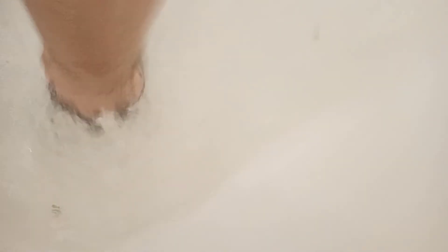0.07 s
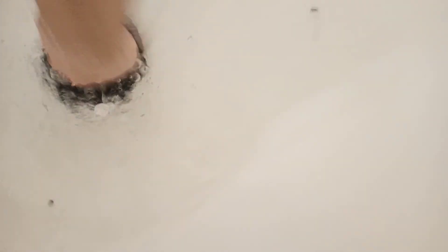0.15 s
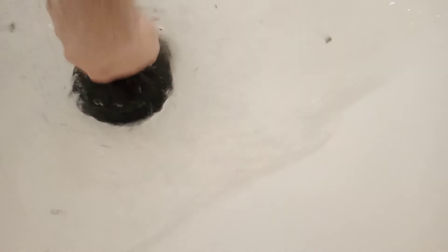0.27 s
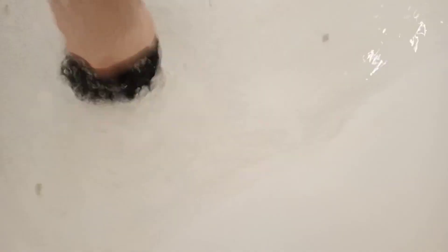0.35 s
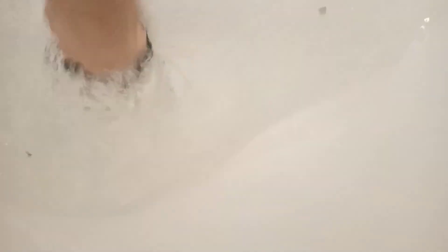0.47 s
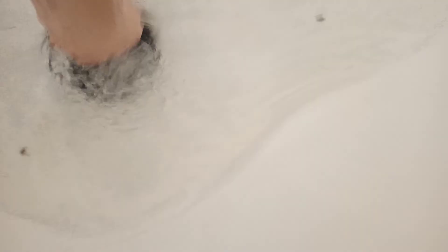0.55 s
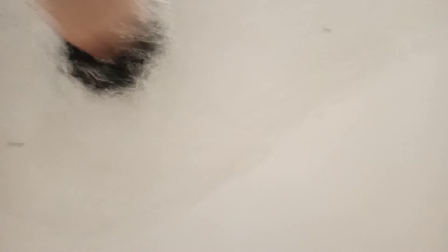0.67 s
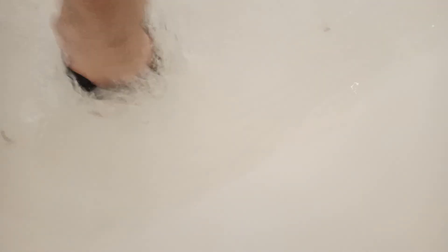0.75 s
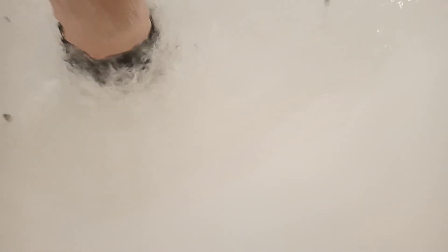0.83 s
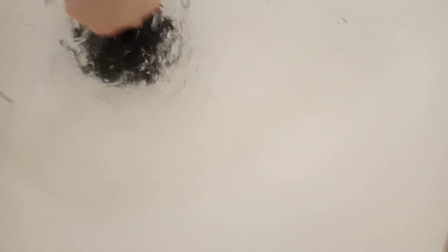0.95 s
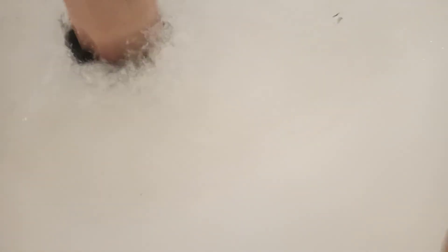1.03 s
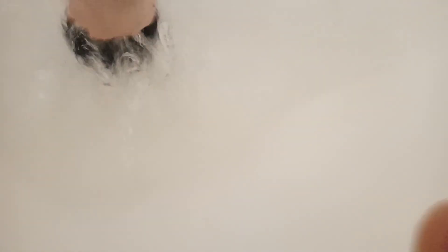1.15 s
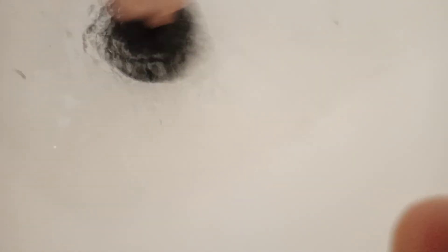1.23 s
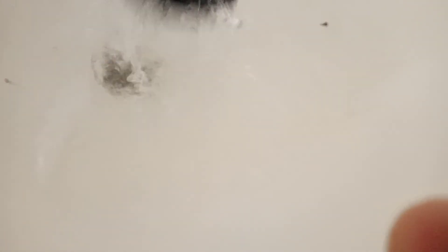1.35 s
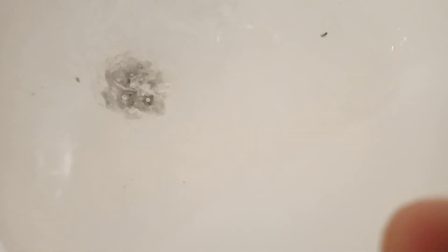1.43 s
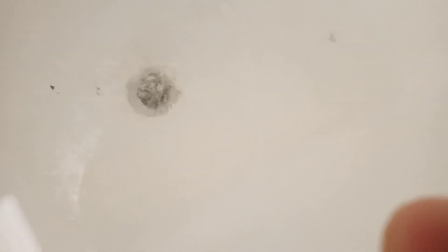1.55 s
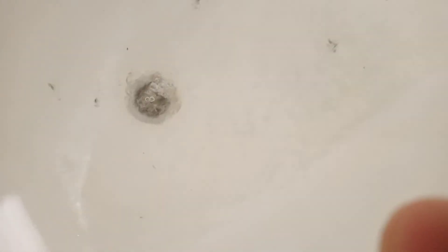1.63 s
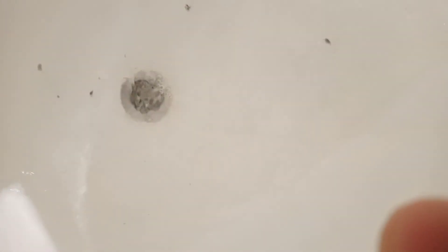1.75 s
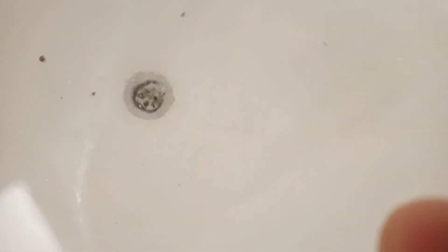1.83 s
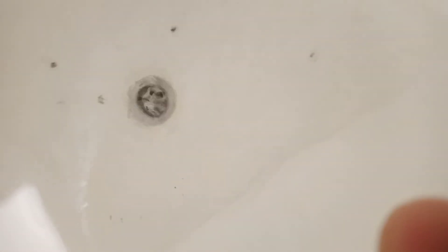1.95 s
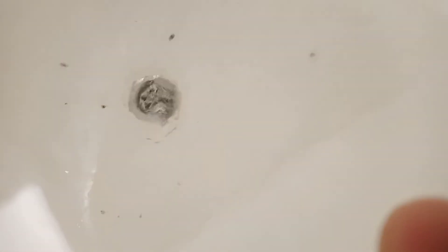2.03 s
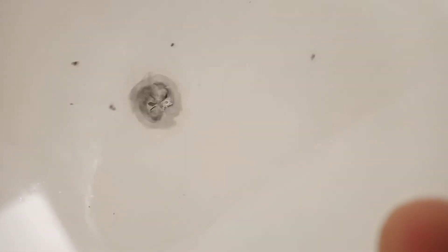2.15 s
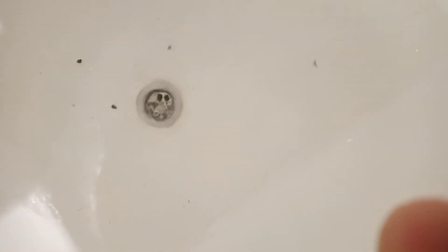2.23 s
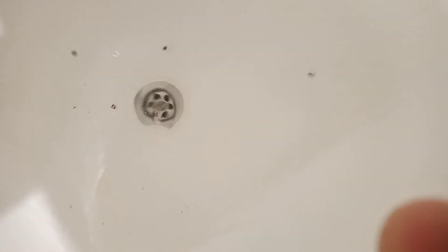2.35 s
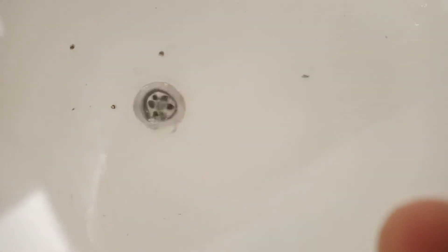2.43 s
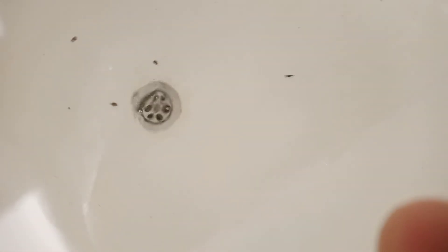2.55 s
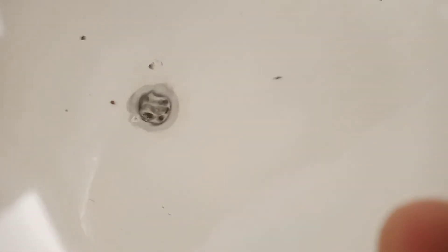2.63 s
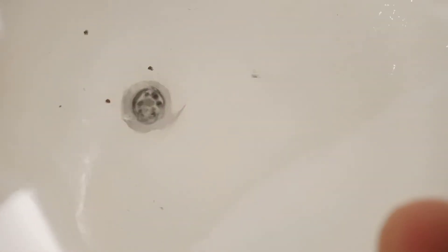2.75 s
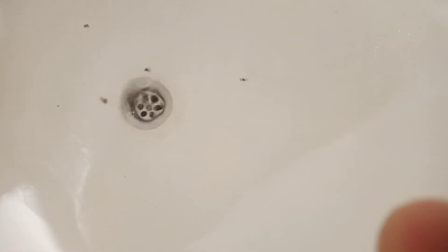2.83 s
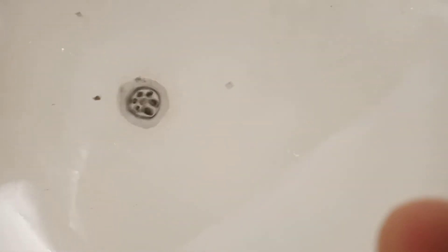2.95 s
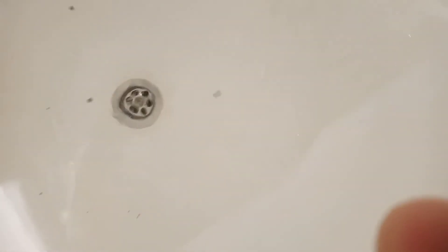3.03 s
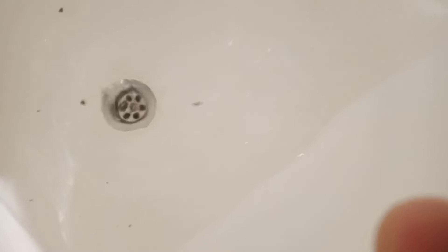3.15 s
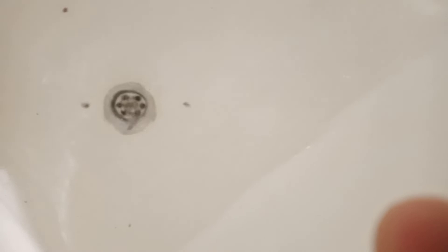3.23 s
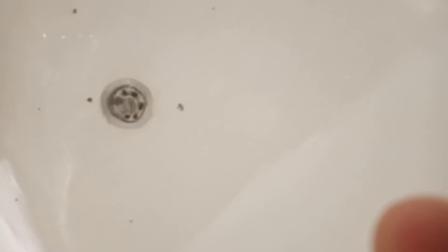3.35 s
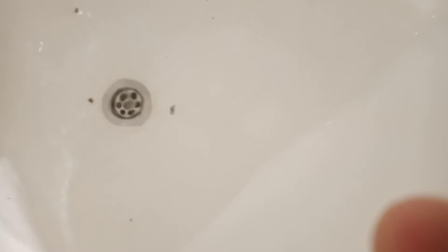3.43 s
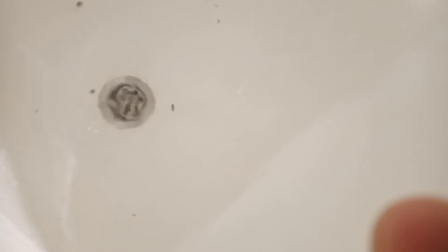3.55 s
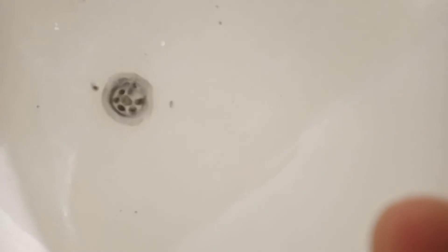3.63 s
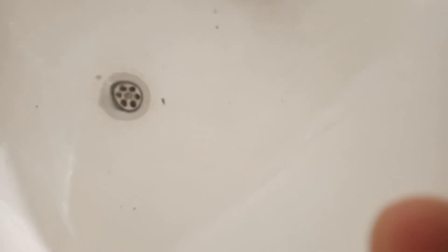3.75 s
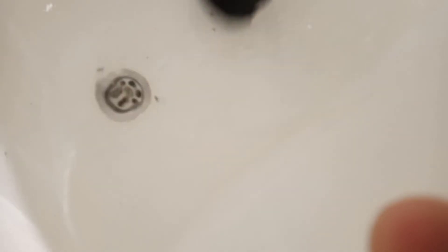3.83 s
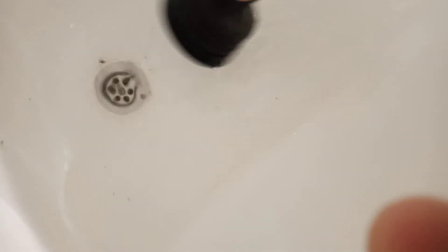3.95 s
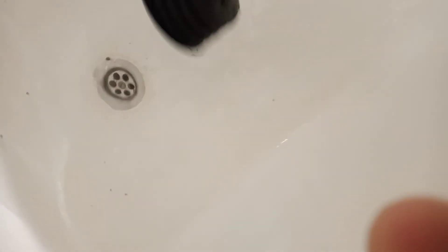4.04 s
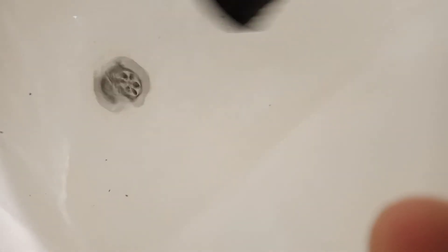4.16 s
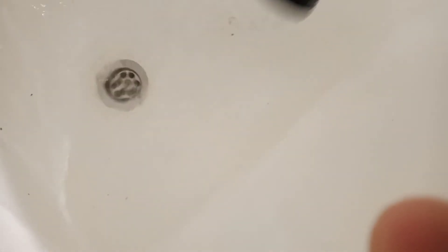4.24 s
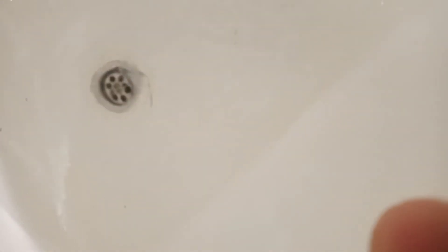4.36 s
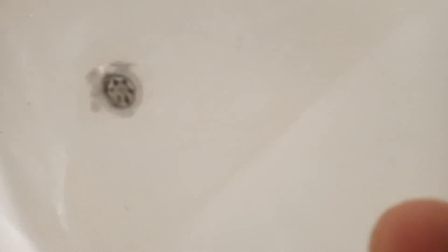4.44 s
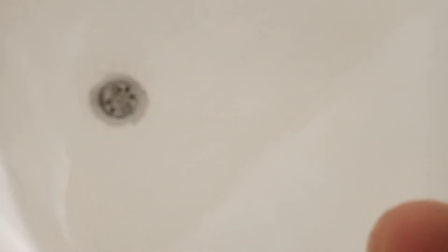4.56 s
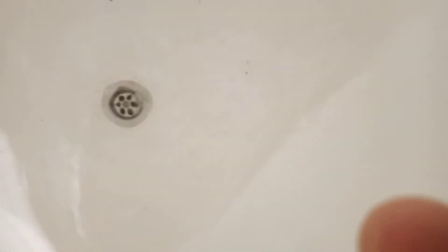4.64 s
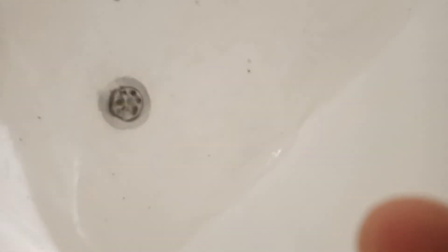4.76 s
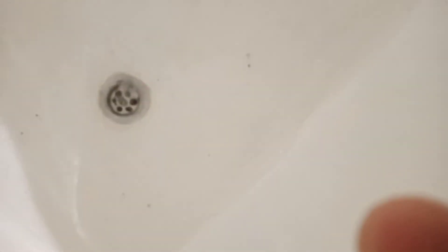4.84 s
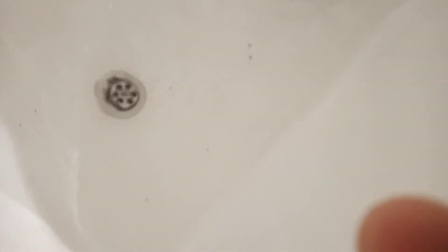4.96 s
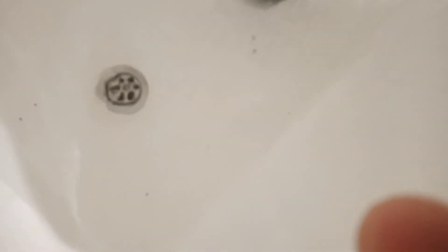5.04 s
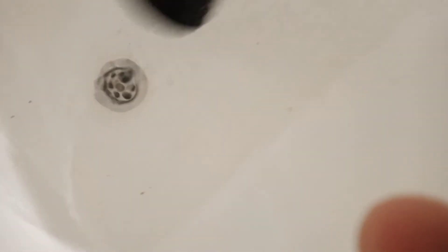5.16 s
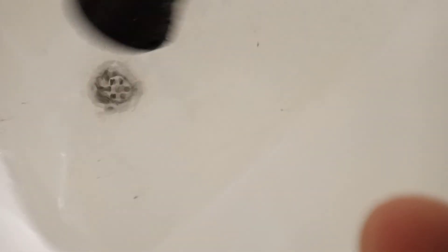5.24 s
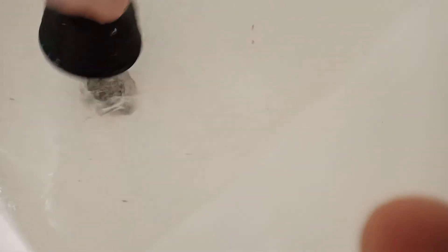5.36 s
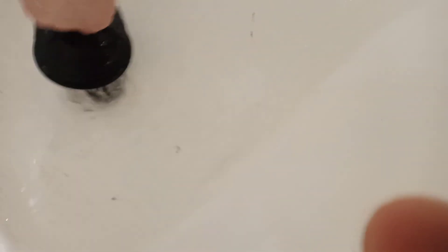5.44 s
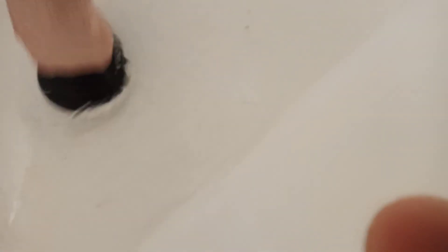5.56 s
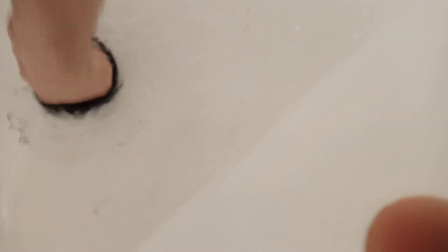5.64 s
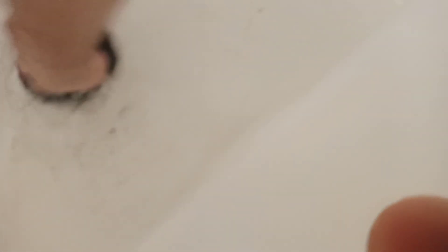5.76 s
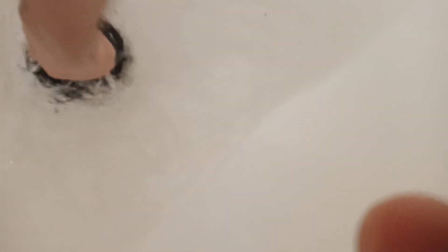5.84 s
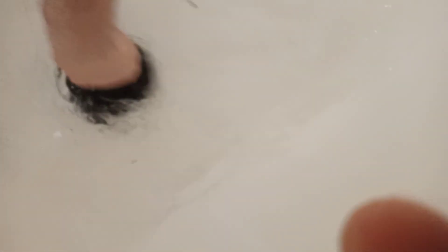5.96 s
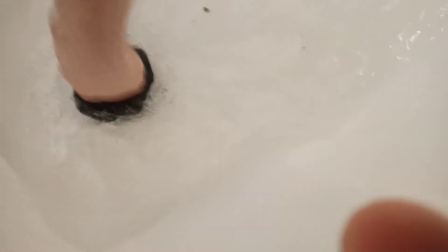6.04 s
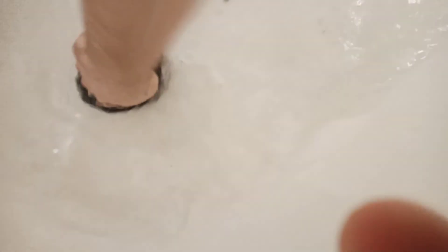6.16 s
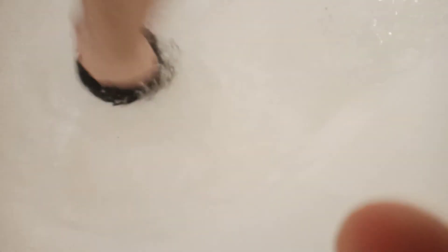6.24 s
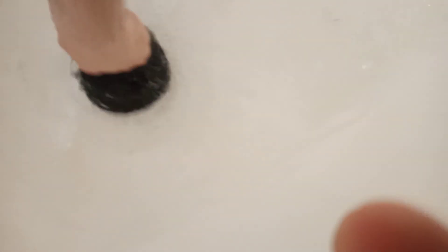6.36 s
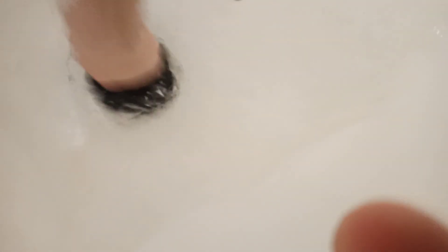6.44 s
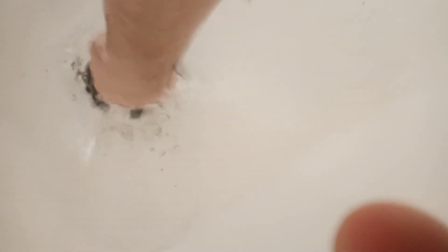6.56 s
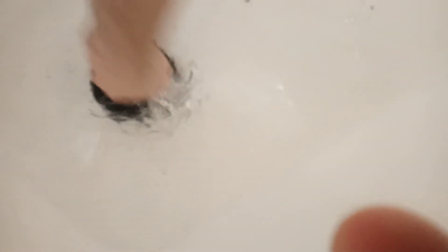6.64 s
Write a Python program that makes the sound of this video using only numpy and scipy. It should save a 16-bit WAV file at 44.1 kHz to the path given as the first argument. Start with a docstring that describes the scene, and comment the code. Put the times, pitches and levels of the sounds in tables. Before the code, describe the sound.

A rubber plunger pumps fast in shallow bathtub water, squelching and slapping, then droplets tick in quiet before wet, gulping strokes resume.

```python
"""Plunger in a bathtub

A rubber plunger is pumped over the drain of a tub with shallow water, lifted, left to drip, and pumped again.
Strokes heave the water (low tub modes struck at random), tear bubbles loose (sines rising as they die) and
throw spray (small bubbles); slaps are noise bursts, trapped air escapes in gulps (gliding sines), droplets tick.
Water and air ring in the hard tub and small bathroom, over handling bumps, a weak rumble and room hush."""
import sys
import numpy as np
from scipy import signal
from scipy.fft import rfft, irfft
from scipy.io import wavfile

SR = 44100
rng = np.random.default_rng(int(sys.argv[2]) if len(sys.argv) > 2 else 0)


def digitize_waveform(pressure):
    """Quantize a signal to 16-bit integers and store it at the path in sys.argv[1].

    Rows of a 2-D input are taken as channels; values are limited to [-1, 1].
    """
    field = np.atleast_2d(pressure).T
    bounded = np.clip(field, -1, 1)
    quanta = np.round(bounded * 32767).astype(np.int16)
    wavfile.write(sys.argv[1], SR, quanta)


N = 295029

# modes of the tub: pitch_hz, relative_level_db, t60_s
TUB_MODES = [(96.5, -4, 0.8), (99.8, -5.5, 0.26), (149.2, 5.5, 0.63), (179.8, 5, 0.22), (228.4, 0.5, 0.34),
             (272.9, -0.5, 0.27), (346.5, 1.5, 0.57), (425, 3.5, 0.61), (504, 3.5, 0.37), (667, -17, 0.27),
             (741, -5.5, .4), (910, -25, 0.14), (1065, -0.5, 0.3), (1080, 5, 0.23), (1290, -19, 0.65),
             (1293, -18.5, 0.99), (1342, 10, 0.074)]


def amp(db):
    """Gain of a dB value."""
    return 10 ** (np.asarray(db) / 20)


def rms_one(x):
    """Scaled to unit rms."""
    return x / np.sqrt(np.mean(x ** 2) + 1e-20)


def add(out, start_s, sound):
    """Mixes a sound in at a time."""
    at = max(round(start_s * SR), 0)
    out[at:at + len(sound)] += sound[:N - at]


def in_time(rows):
    """Columns of a curve table, one value a sample."""
    time_s, *columns = np.transpose(rows)
    return [np.interp(np.arange(N) / SR, time_s, column) for column in columns]


def at_hz(points, hz):
    """A spectrum table read on a log-frequency axis."""
    points_hz, values = np.transpose(points)
    return np.interp(np.log(np.maximum(hz, 1)), np.log(points_hz), values)


def colour(x, points):
    """Causal (minimum-phase) filter with the given response in dB."""
    size = 8192
    bins_hz = np.arange(size // 2 + 1) * SR / size
    cepstrum = irfft(np.log(amp(at_hz(points, bins_hz))), size)
    cepstrum[1:size // 2] *= 2   # fold onto positive time
    cepstrum[size // 2 + 1:] = 0
    impulse = irfft(np.exp(rfft(cepstrum)), size)
    return signal.fftconvolve(x, impulse)[:N]


def band_pass(x, low_hz, high_hz):
    """Second-order Butterworth band."""
    return signal.sosfilt(signal.butter(2, [low_hz, high_hz], "band", fs=SR, output="sos"), x)


def ring(x, hz, t60_s):
    """Two-pole resonator: a unit click sets a decaying sine ringing."""
    r = amp(-60 / (t60_s * SR))
    w = 2 * np.pi * min(hz, .45 * SR) / SR
    return signal.lfilter([0, np.sin(w)], [1, -2 * r * np.cos(w), r * r], x + 1e-18)


def bubble(hz, cycles, rise_octaves, swell_cycles=1.2):
    """A bubble pinches off within a cycle or two, then rises in pitch as it dies."""
    cycles = max(cycles, 2)
    turns = np.arange(int(1.2 * cycles / hz * SR)) * hz / SR
    life = turns / cycles   # 1 at -60 dB
    tone = np.sin(2 * np.pi * np.cumsum(hz * 2 ** (rise_octaves * life)) / SR)
    shape = (1 - np.exp(-turns / swell_cycles)) ** 2 * amp(-60 * life)
    return tone * shape / shape.max()


def bursts(pitches_hz, per_s, cycles, rise_octaves, spread_db, share, swell_cycles=0.81):
    """Random bubbles of uneven size dealt to the pitches; share(hz) weighs each pitch."""
    sizes = amp(spread_db * np.minimum(rng.exponential(1, N), 3)) * rng.choice([-1, 1], N)
    clicks = sizes * (rng.random(N) < per_s / SR)
    dealt = rng.integers(0, len(pitches_hz), N)
    total = np.zeros(N)
    for k, hz in enumerate(pitches_hz):
        own_clicks = clicks * (dealt == k) * share(hz)
        total += signal.oaconvolve(own_clicks, bubble(hz, cycles, rise_octaves, swell_cycles))[:N]
    return rms_one(total)


def stirring():
    """Heave dB, bubbling dB, bubble pitch and spray dB: each stroke swells and fades over the water's unrest."""
    # unrest between strokes and settling: time_s, heave_db, bubbling_db, bubble_pitch_hz, spray_db
    settling = [(0, -34, -29.5, 602, -36), (1.28, -33.5, -23, 789, -38), (1.44, -46, -43, 1030, -36),
                (1.6, -51, -34.5, 1158, -34.5), (1.8, -50, -38, 479, -36.5), (1.95, -43.5, -32, 606, -37.5),
                (2.16, -65, -52, 615, -46.5), (2.36, -56.5, -62, 784, -58), (2.47, -54, -44.5, 1195, -43.5),
                (2.62, -53.5, -41, 1077, -53.5), (2.95, -64, -52.5, 475, -55), (3.2, -83, -60, 470, -63.5),
                (3.39, -77, -74, 424.5, -74.5), (3.67, -70.5, -68.5, 1093, -63.5),
                (3.9, -66, -57.5, 790, -56.5), (4.2, -58.5, -55, 1200, -51.5),
                (4.4, -57, -56, 450.7, -58.5), (4.78, -65.5, -70, 740, -59.5),
                (4.93, -38.5, -32.5, 800, -30), (5.29, -69.5, -46, 788, -40), (5.52, -54, -37.5, 586, -40),
                (5.56, -17.5, -20.5, 506, -30.5), (5.92, -39.5, -26, 520, -36.5),
                (6.69, -51.5, -24, 500, -43.5)]
    # plunger pushed, pulled, or shedding water:
    # start_s, swell_db_per_s, heave_db, bubbling_db, bubble_pitch_hz, spray_db
    strokes = [(0.02, 304, -9.5, -11.5, 642, -23.5), (0.21, 1502, -13.5, -9.5, 1017, -41),
               (0.321, 602.5, -31, -21, 531, -30.5), (0.378, 602, -13.5, -15.5, 500, -24.5),
               (0.533, 498, -6, -9.5, 611, -28), (0.649, 299.5, -32, -13.5, 459, -35.5),
               (0.702, 502, -14.5, -11.5, 500, -24), (0.869, 296.5, -8, -10.5, 1075, -26),
               (1.037, 601.5, -8.5, -11, 511, -23.5), (1.176, 352, -8, -13, 1116, -24.5),
               (1.24, 401.5, -18, -16.5, 895, -28), (4.85, 1500.5, -47, -22.5, 832, -30.5),
               (4.92, 800.5, -26.5, -31.5, 794, -36), (5.13, 151.5, -60, -33.5, 1435, -23.5),
               (5.541, 3998, -4, -28.5, 459, -17.5), (5.607, 502, -10, -15, 752, -16),
               (5.77, 398, -25, -17, 460, -27), (5.96, 3001, -12, -12, 888, -41),
               (6.06, 303, -11, -17.5, 560, -31), (6.14, 302, -6.5, -18.5, 465.5, -28.5),
               (6.299, 2503, -10.5, -8, 816, -36), (6.43, 400.5, -19, -20, 919, -20.5),
               (6.479, 402.5, -14.5, -10, 520, -21), (6.599, 494, -11, -16.5, 400.4, -14.5),
               (6.69, 401.5, -0.5, -9, 864, -26)]
    heave_fade_db_per_s, bubbling_fade_db_per_s, spray_fade_db_per_s = 199, 142, 190.5
    sag_octaves_per_s = 0.92   # bubbles grow larger as a stroke dies

    heave_db, bubbling_db, pitch_hz, spray_db = in_time(settling)
    start_s, swell, heave, bubbling, hz, spray = np.transpose(strokes)[:, :, None]
    since_s = np.arange(N) / SR - start_s

    def stroke_db(level_db, fade):
        return level_db + np.minimum(swell * since_s, -fade * since_s)

    all_bubbling_db = np.vstack([bubbling_db, stroke_db(bubbling, bubbling_fade_db_per_s)])
    sagging_octaves = np.log2(hz) - sag_octaves_per_s * np.maximum(since_s, 0)
    all_octaves = np.vstack([np.log2(pitch_hz), sagging_octaves])
    power = amp(all_bubbling_db) ** 2
    mean_pitch_hz = 2 ** (np.sum(power * all_octaves, 0) / power.sum(0))
    heave_db = np.maximum(heave_db, stroke_db(heave, heave_fade_db_per_s).max(0))
    spray_db = np.maximum(spray_db, stroke_db(spray, spray_fade_db_per_s).max(0))
    return heave_db, all_bubbling_db.max(0), mean_pitch_hz, spray_db


def stirred_water(heave_db, bubbling_db, pitch_hz, spray_db):
    """Heave, bubbles crowding round one size at a time, and fine spray."""
    def bubbling_share(hz):
        crowd = np.exp(-(np.log2(hz / pitch_hz) / 0.47) ** 2)
        return np.sqrt(hz / 700) * (0.61 + crowd)

    low_modes_hz = [hz for hz, _, _ in TUB_MODES[:6]]   # the water's weight shakes the tub's floor
    heave = bursts(low_modes_hz, per_s=200, cycles=11.0, rise_octaves=.03, spread_db=1.4,
                   share=lambda hz: (hz / 200) ** 0.58)
    bubbling = bursts(np.geomspace(320, 1600, num=18), per_s=280, cycles=17.6, rise_octaves=0.22,
                      spread_db=3.6, share=bubbling_share)
    spray = bursts(np.geomspace(1500, 14000, num=22), per_s=2200, cycles=22, rise_octaves=0.19,
                   spread_db=5.6, share=lambda hz: (hz / 3000) ** 0.2)
    return amp(heave_db) * heave + amp(bubbling_db) * bubbling + amp(spray_db) * spray


def plops():
    """Single bubbles, large and small; each droplet adds a short, higher surface tick to its ring."""
    # bubbles from strokes and drops: start_s, level_db, pitch_hz, ring_cycles
    large = [(0.015, -6, 549, 15), (0.2, 2.5, 823, 4.4), (0.31, -7, 523, 31), (0.369, -6.5, 510, 3.3),
             (0.462, -3, 1160, 16), (0.504, -6, 820, 12), (0.519, 0.5, 1044, 3.3), (0.695, -3, 595, 5.5),
             (0.809, -8, 1060, 18), (0.857, -4.5, 1080, 22), (1.01, -4.5, 473, 15), (1.024, 1.5, 550, 18),
             (1.14, -7.5, 1200, 16), (1.165, -3.5, 1210, 19), (1.214, -5, 1340, 12), (1.482, -29, 1080, 17),
             (1.579, -24, 1150, 13), (1.723, -14.5, 1920, 19), (1.767, -50, 480, 9.8),
             (1.815, -35, 467, 16), (1.887, -23, 492, 14), (1.93, -21.5, 667, 18), (2.067, -26.5, 2000, 67),
             (2.219, -19.5, 2120, 16), (2.445, -42, 1240, 17), (2.485, -9.5, 1150, 20),
             (2.57, -26.5, 2150, 12), (2.651, -18, 864, 22), (3.049, -45.5, 2390, 60),
             (4.069, -32.5, 946, 17), (4.17, -19.5, 2410, 20), (4.189, -17, 1700, 8.1),
             (4.845, -6.5, 800, 6.7), (4.908, -15.5, 1960, 33), (4.939, -27, 714, 18),
             (5.01, -13, 1046, 14), (5.029, -13.5, 1970, 19), (5.14, -5, 1870, 8.6), (5.17, -19, 2530, 15),
             (5.36, -17.5, 1800, 6.2), (5.534, -6, 395, 11), (5.599, 1, 910, 16), (5.74, -12.5, 410, 14),
             (5.956, -8.5, 750, 12), (6.109, -3, 419, 7.2), (6.263, -10.5, 605, 19), (6.297, 1, 1113, 11),
             (6.419, -7, 2260, 26)]
    # clearest small droplets landing: start_s, level_db, pitch_hz
    droplets = [(1.4133, -26.5, 4230), (1.4866, -26.5, 3400), (1.5938, -26.5, 3670), (1.68, -33, 3460),
                (1.721, -28, 3200), (1.7497, -34, 2970), (1.769, -27, 3440), (1.8162, -21.5, 4050),
                (1.9296, -18, 4060), (1.982, -27, 4080), (2.0797, -17, 4280), (2.167, -30, 2800),
                (2.2075, -29, 3140), (2.2672, -27.5, 4200), (2.289, -26.5, 3420), (2.418, -36, 3930),
                (2.456, -23.5, 4980), (2.4716, -36, 3940), (2.5312, -40, 3250), (2.568, -38, 4000),
                (2.6036, -33, 4020), (2.905, -43.5, 4840), (2.998, -40, 6300), (3.0251, -28, 4590),
                (3.688, -29.5, 2626), (3.795, -31, 3760), (3.924, -31, 2740), (3.959, -29.5, 3340),
                (4.168, -31.5, 2770), (4.187, -24, 3070), (4.3208, -37.5, 3680), (4.787, -27, 3550),
                (4.813, -23.5, 4350), (4.8517, -28, 3720), (4.94, -37, 3230), (4.9787, -31.5, 2900),
                (5.029, -23.5, 2830), (5.067, -22.5, 3420), (5.095, -30, 4040), (5.1076, -15, 4730),
                (5.141, -20, 3140), (5.328, -25, 3180), (5.3953, -29.5, 3460), (5.432, -31.5, 3700)]
    tick_db = 14   # above the droplet's ring
    out = np.zeros(N)
    for start_s, level_db, hz, cycles in large:
        add(out, start_s, amp(level_db) * bubble(hz, cycles, rise_octaves=0.18, swell_cycles=1.4))
    for start_s, level_db, hz in droplets:
        add(out, start_s, amp(level_db) * bubble(hz, cycles=55.5, rise_octaves=0.025))
        tick = bubble(2.2 * hz, cycles=7, rise_octaves=.3, swell_cycles=.5)
        add(out, start_s, amp(level_db + tick_db) * tick)
    return out


def slaps(attack_s=0.0057):
    """Water slapped flat: a sudden burst of broad noise dying away."""
    # slaps: start_s, level_db, centre_hz, t60_s
    slap_table = [(.2, -1, 1115, 0.19), (.52, -1.5, 940, 0.21), (.67, -15.5, 4000, 0.071),
                  (1.026, -9, 1980, 0.13), (1.214, -5.5, 2420, 0.045), (3.686, -26.5, 2630, 0.21),
                  (3.923, -32, 3000, 0.026), (4.169, -26.5, 2410, 0.22), (4.787, -33, 3500, 0.11),
                  (5.139, -39.5, 2480, 0.031), (5.537, 0, 637, 0.078), (5.601, -23, 1570, 0.063),
                  (5.956, 2.5, 950, 0.065), (6.296, -0.5, 1000, 0.5)]
    out, t = np.zeros(N), np.arange(SR // 5) / SR
    for start_s, level_db, hz, t60_s in slap_table:
        burst = rng.standard_normal(len(t)) * (1 - np.exp(-t / attack_s)) * amp(-60 * t / t60_s)
        broad = ring(burst, hz, 2.2 / hz)
        add(out, start_s, amp(level_db) * broad / np.abs(broad).max())
    return out


def gulps():
    """Each rising air pocket sings a near sine that swells, glides in pitch and breaks off."""
    # air pockets: start_s, length_s, first_pitch_hz, last_pitch_hz, level_db
    pockets = [(.3, .05, 420, 800, -15.5), (0.8, .12, 340, 520, -21), (1.054, 0.045, 415, 593, -10),
               (1.745, 0.052, 500, 440, -30), (1.83, .05, 420, 500, -32), (1.94, .06, 600, 430, -30),
               (3.996, 0.023, 1250, 2500, -41), (4.028, 0.045, 526, 1360, -31.5),
               (5.766, 0.046, 340, 670, -2), (5.808, 0.033, 592, 1180, -16), (6.1, 0.095, 323, 552, -16.5),
               (6.462, 0.076, 287, 750, -16.5), (6.553, 0.035, 250, 340, -8), (6.596, 0.03, 304, 560, -1.5),
               (6.61, 0.04, 1420, 1500, -23), (6.645, .05, 540, 1060, -12)]
    out = np.zeros(N)
    for start_s, length_s, first_hz, last_hz, level_db in pockets:
        part = np.linspace(0, 1, max(int(length_s * SR), 2))
        phase = 2 * np.pi * np.cumsum(first_hz * (last_hz / first_hz) ** part) / SR
        shape = np.sin(np.pi * part ** 0.77) ** 0.54
        add(out, start_s, amp(level_db) * shape * np.sin(phase))
    return out


def foam(spray_db):
    """Sparse pinpricks of foam bursting; their level fades more slowly than the spray."""
    pricks = bursts(np.geomspace(4500, 14500, num=10), per_s=50, cycles=12, rise_octaves=0.11,
                    spread_db=4.0, share=lambda hz: (hz / 6000) ** 2.4)
    return amp(0.55 * spray_db - 32.0) * pricks


def bathroom(x, modes_db=-53.5, walls_db=-3.5, first_echo_s=0.0043):
    """Direct sound, the tub's modes and a dense tail that dies band by band."""
    # reverberation: frequency_hz, t60_s
    room_t60 = [(300, 0.51), (600, 0.29), (1500, 0.41), (4000, 0.31), (10000, 0.28)]
    t = np.arange(SR) / SR
    click = 1. * (t == 0)
    modes = np.zeros(SR)
    for k, (hz, level_db, t60_s) in enumerate(TUB_MODES):
        modes += (-1) ** k * amp(level_db) * ring(click, hz, t60_s)
    tail = np.zeros(SR)
    edges_hz = 240 * 2 ** np.arange(0, 6.1, .5)   # the modes carry the low part
    for low_hz, high_hz in zip(edges_hz, edges_hz[1:]):
        band = band_pass(rng.standard_normal(SR), low_hz, high_hz)
        hz = np.sqrt(low_hz * high_hz)
        tail += (hz / 2000) ** 0.058 * band * amp(-60 * t / at_hz(room_t60, hz))
    tail *= t > first_echo_s
    walls = tail / np.sqrt(np.sum(tail ** 2))
    response = click + amp(walls_db) * walls + amp(modes_db) * modes
    return signal.fftconvolve(x, response)[:N]


def handling(heave_db):
    """Rough, dull bumps through the housing over a weak rumble that follows the water's heave."""
    # hand bumping the microphone: start_s, level_db, pitch_hz
    thumps = [(3.771, -59, 90.6), (3.881, -40, 95), (4.016, -42, 106), (4.087, -33, 80.7), (4.185, -31, 90),
              (4.325, -34.5, 101.6), (4.445, -29, 135), (4.539, -33.5, 124), (4.594, -32, 80.7),
              (4.764, -27, 83), (4.917, -26, 100)]
    out, t = np.zeros(N), np.arange(SR // 5) / SR
    for start_s, level_db, hz in thumps:
        rough = rng.standard_normal(len(t)) * amp(-60 * t / 0.14)
        bump = ring(ring(rough, hz, 2.0 / hz), hz, 2.8 / hz)
        add(out, start_s, amp(level_db) * bump / np.abs(bump).max())
    rumble = band_pass(rng.standard_normal(N), 50, 120)
    return out + amp(0.37 * heave_db - 37.0) * rms_one(rumble)


def hush(level_db=-63.5):
    """Quiet room and microphone hiss: steady coloured noise."""
    # noise spectrum: frequency_hz, relative_density_db
    spectrum = [(25, 0.5), (60, -5.5), (100, 3), (160, -4), (230, -10), (400, 5.5), (800, -19), (1200, -10),
                (2600, -13), (3800, -7), (5200, -21), (6300, -21.5), (10000, -33), (16000, -42)]
    return amp(level_db) * rms_one(colour(rng.standard_normal(N), spectrum))


def scene():
    """Water and air in the bathroom through the microphone, plus handling and hush."""
    # microphone response: frequency_hz, gain_db
    microphone = [(30, -39), (100, -12.5), (300, -5), (3000, 2), (4200, -0.5), (5000, -15.5), (5700, -22),
                  (6500, -17.5), (8500, -25), (10500, -33.5), (12500, -31), (15000, -28), (16000, -23.5)]
    gulp_near_db = -9.5   # gulps heard directly, besides their sound in the room
    heave_db, bubbling_db, pitch_hz, spray_db = stirring()
    water = stirred_water(heave_db, bubbling_db, pitch_hz, spray_db) + foam(spray_db) + plops() + slaps()
    air = gulps()
    heard = bathroom(water + air) + amp(gulp_near_db) * air
    return (colour(heard, microphone) + handling(heave_db) + hush())[None]


def record(dry, bass_cut_hz=80, top_cut_hz=15750):
    """Peaks are rounded, the deep bass is shed, the top is cut."""
    rounded = 0.84 * np.tanh(dry / 1.062)
    thin = signal.sosfilt(signal.butter(2, bass_cut_hz, "high", fs=SR, output="sos"), rounded)
    return signal.sosfilt(signal.ellip(10, .5, 70, top_cut_hz, fs=SR, output="sos"), thin)


dry = scene()
out = record(dry)
digitize_waveform(out)
```